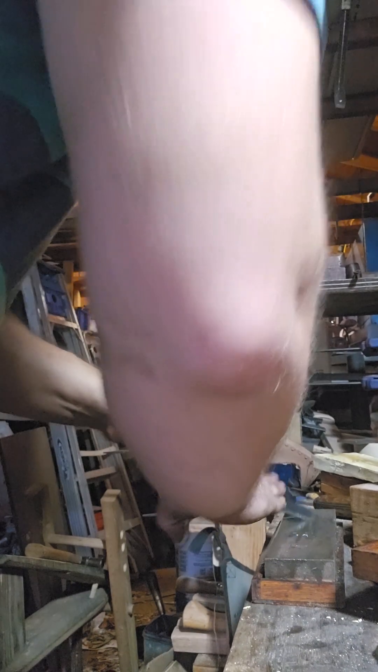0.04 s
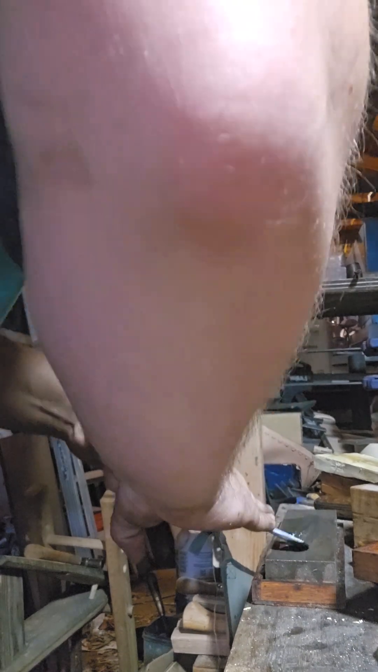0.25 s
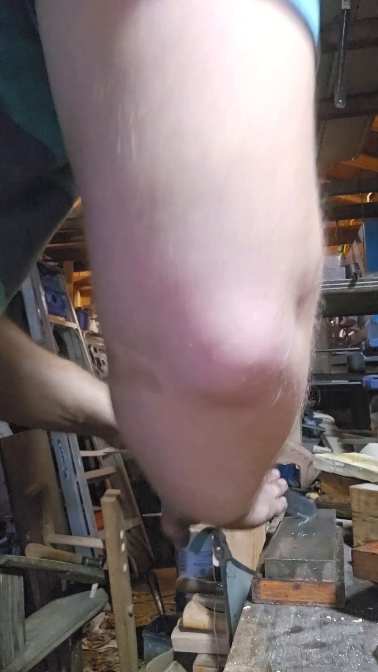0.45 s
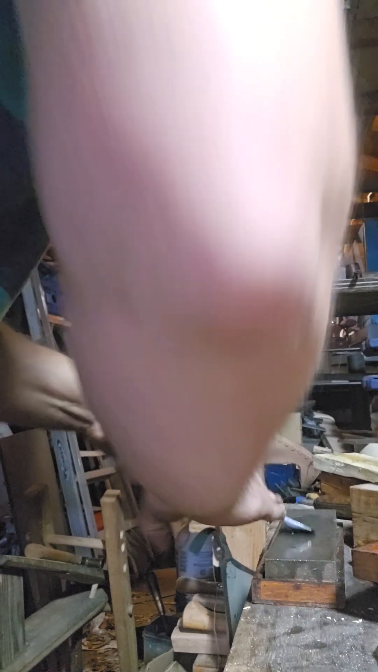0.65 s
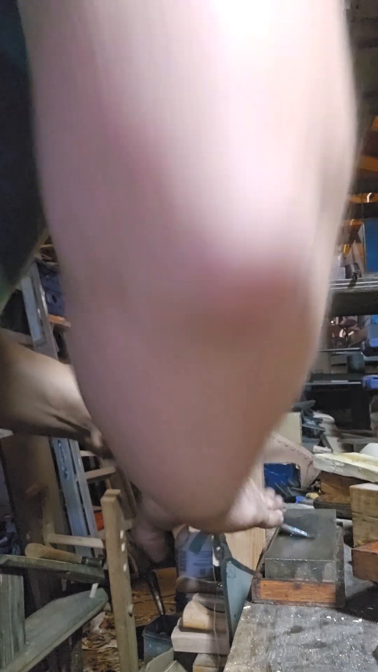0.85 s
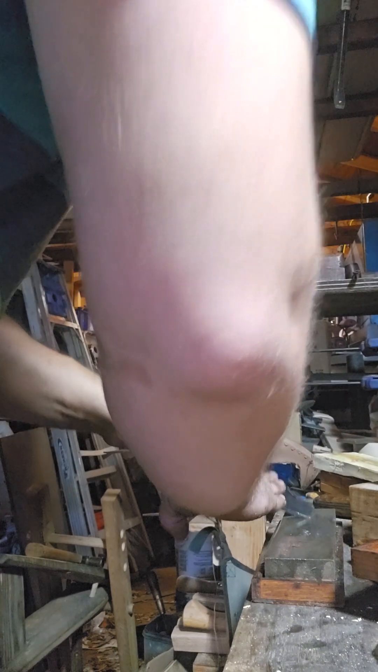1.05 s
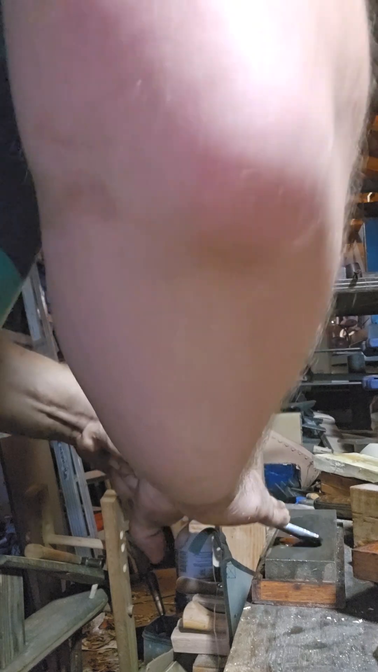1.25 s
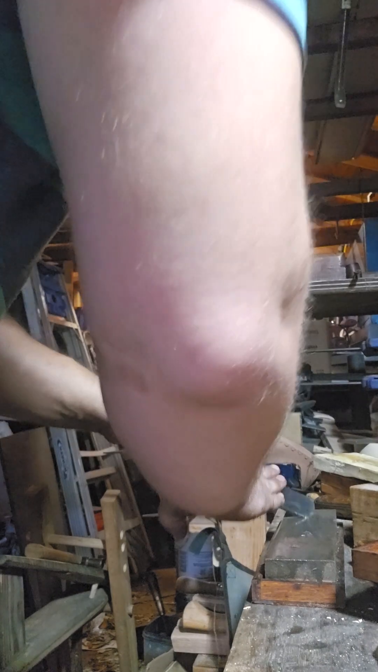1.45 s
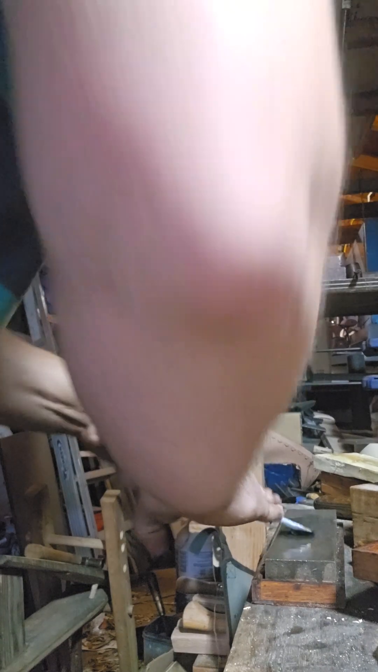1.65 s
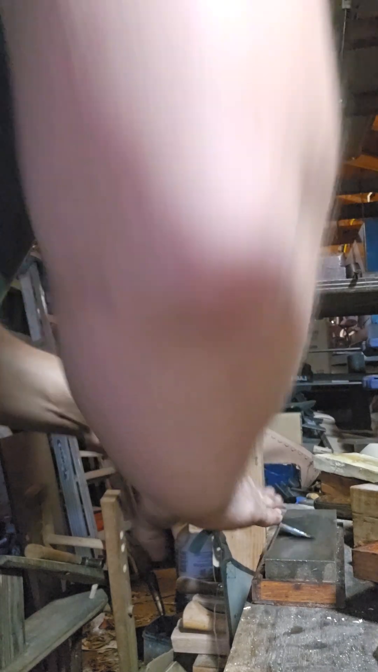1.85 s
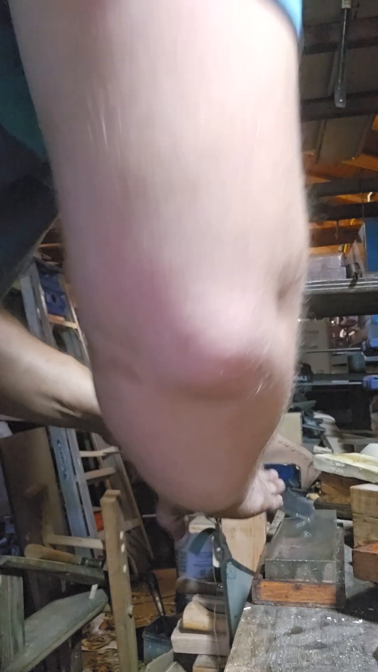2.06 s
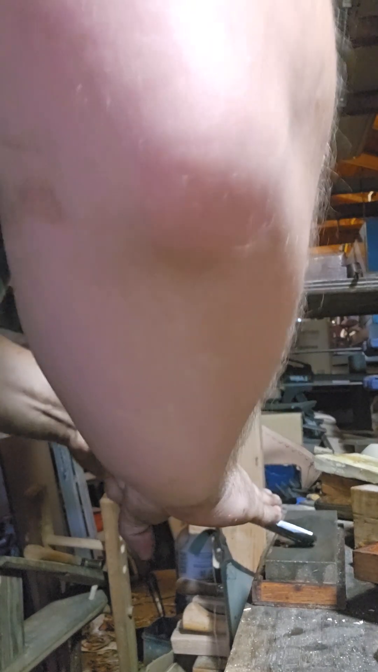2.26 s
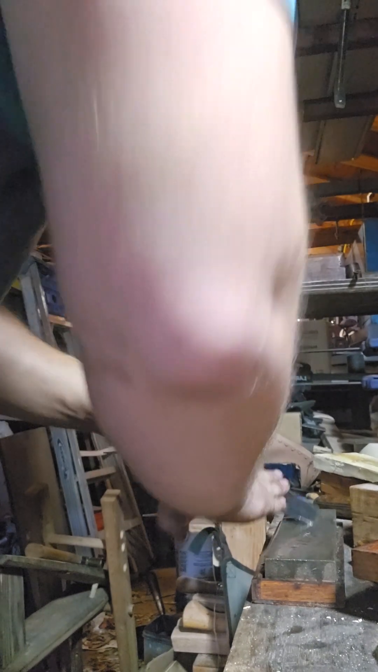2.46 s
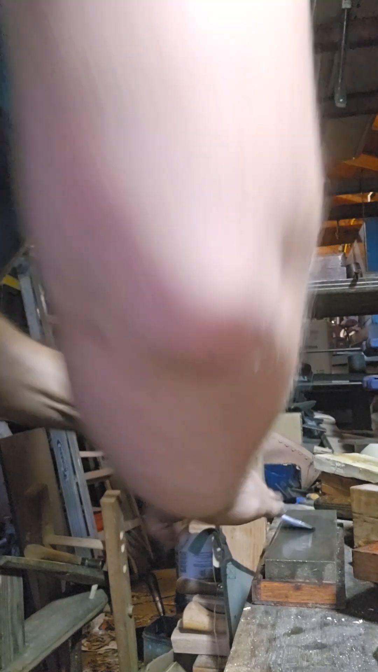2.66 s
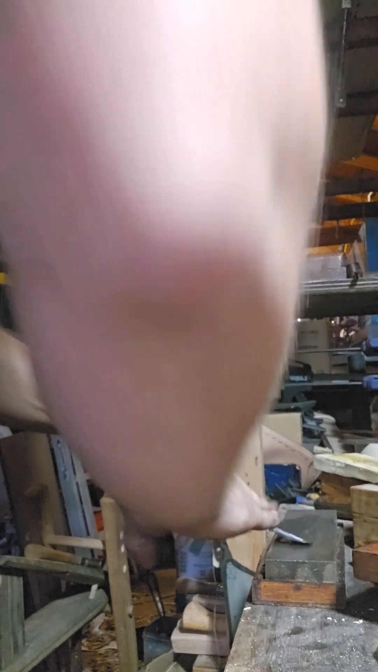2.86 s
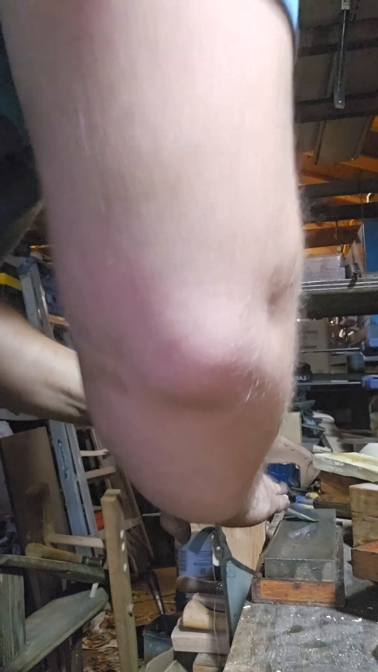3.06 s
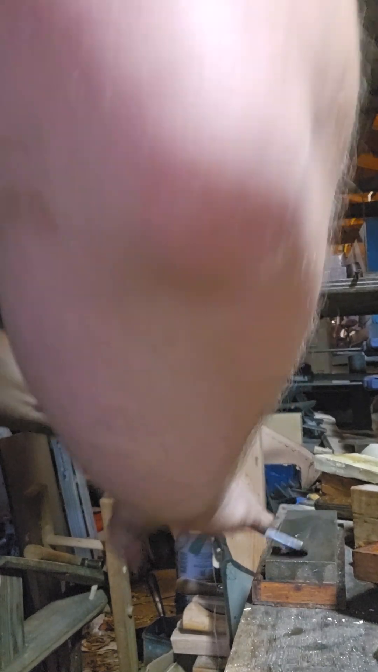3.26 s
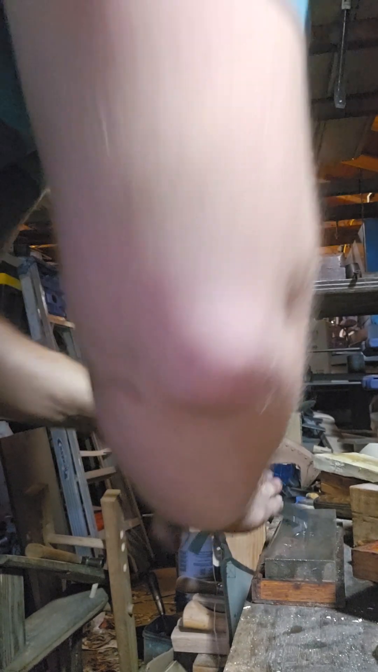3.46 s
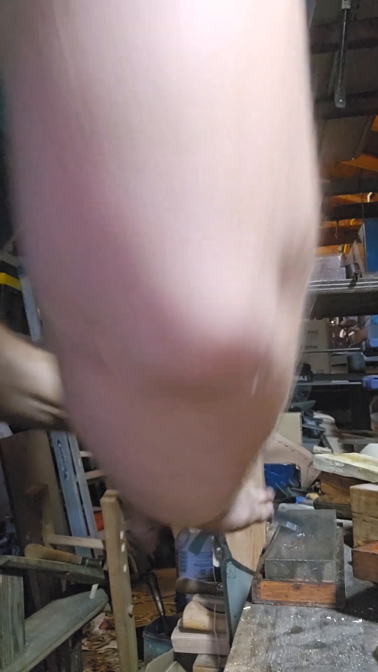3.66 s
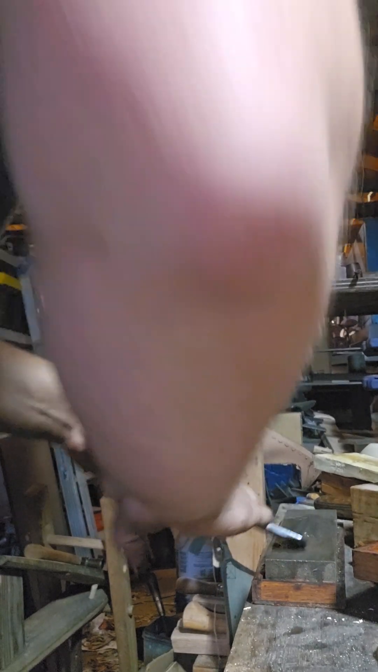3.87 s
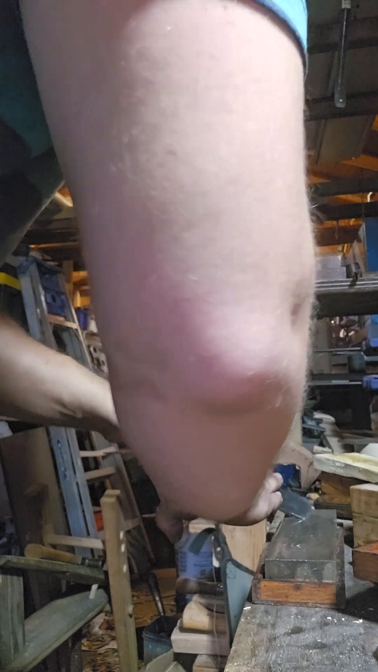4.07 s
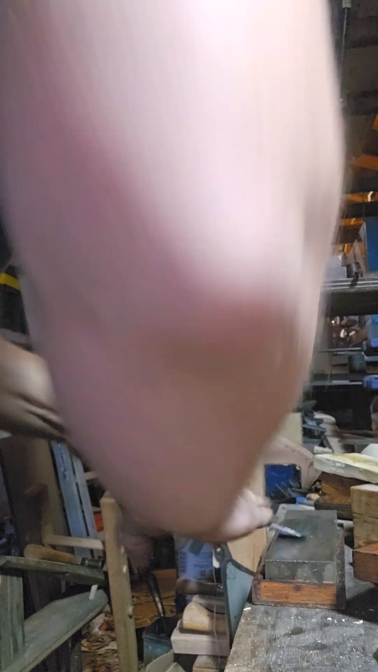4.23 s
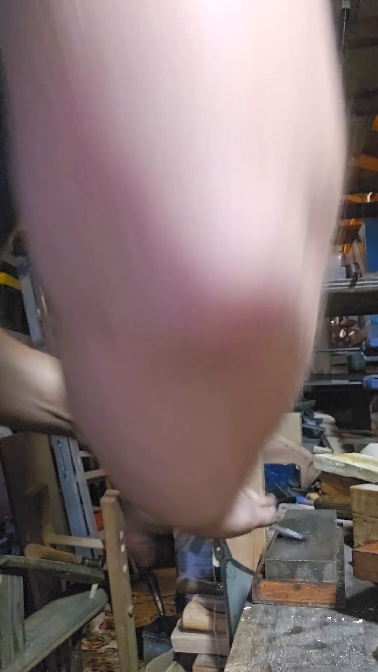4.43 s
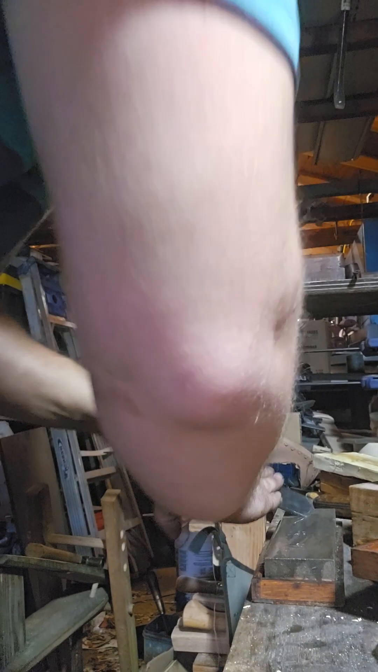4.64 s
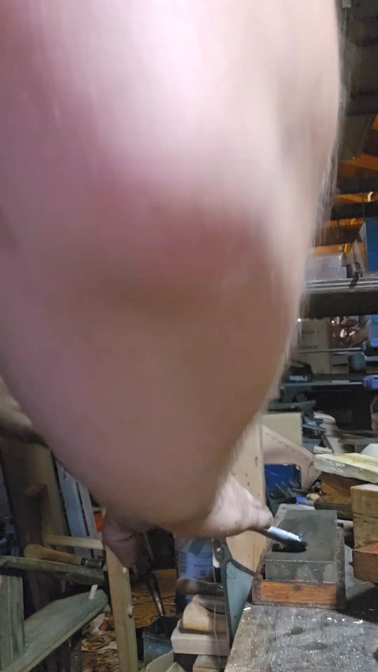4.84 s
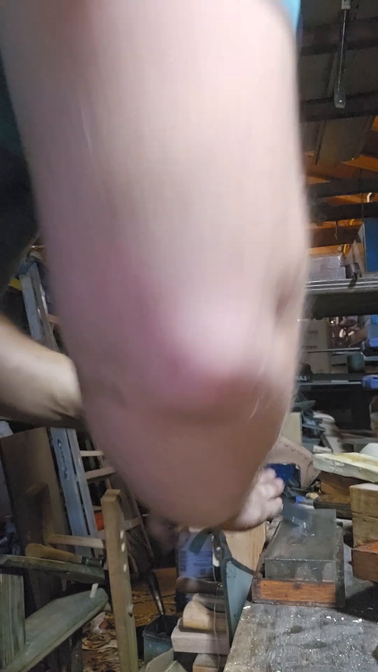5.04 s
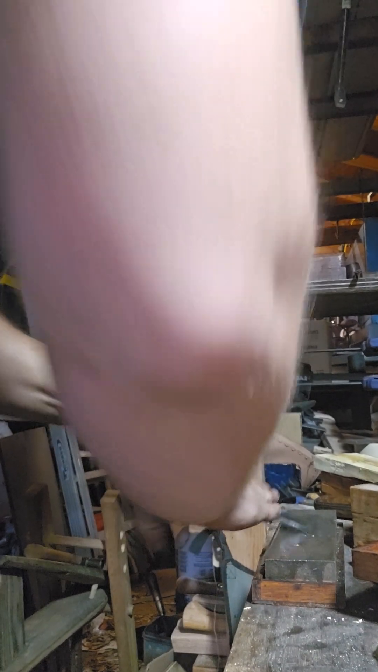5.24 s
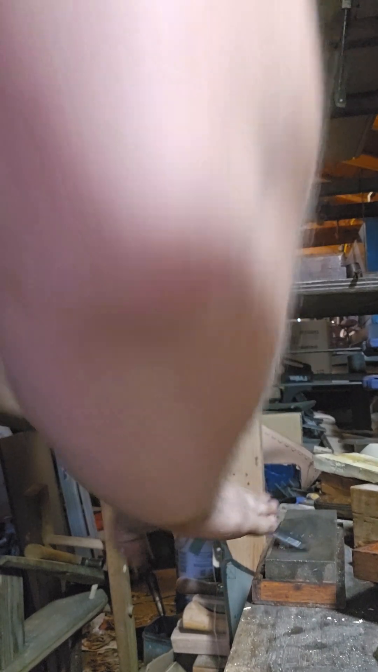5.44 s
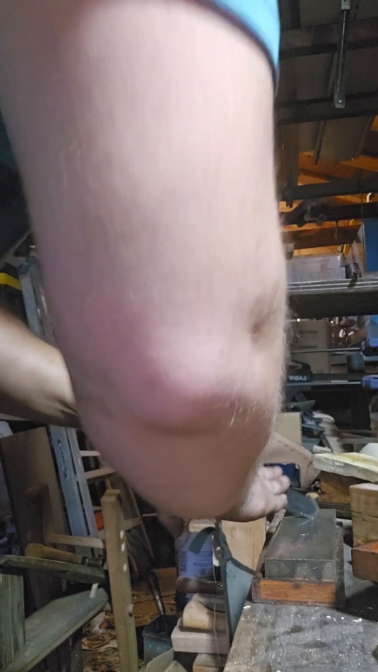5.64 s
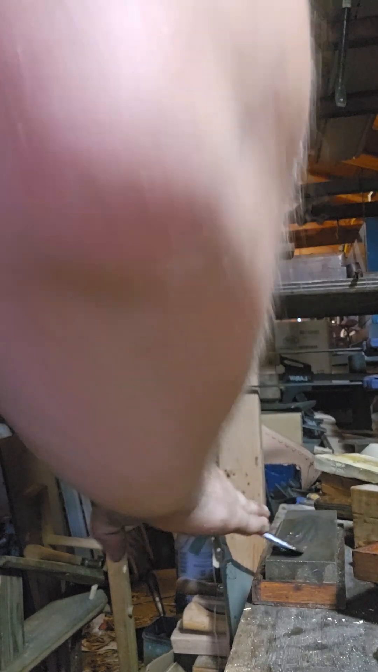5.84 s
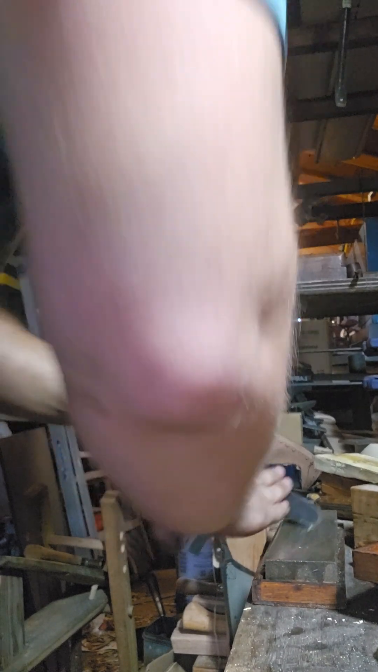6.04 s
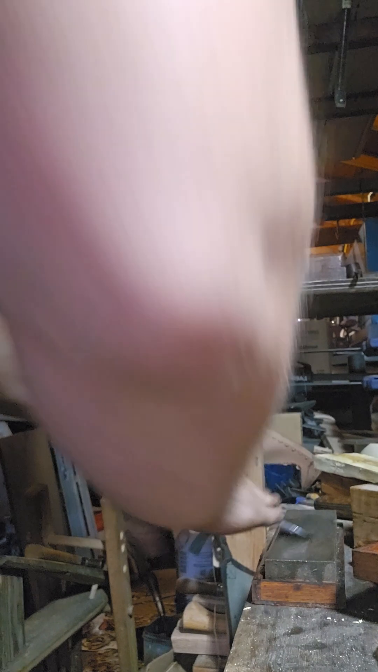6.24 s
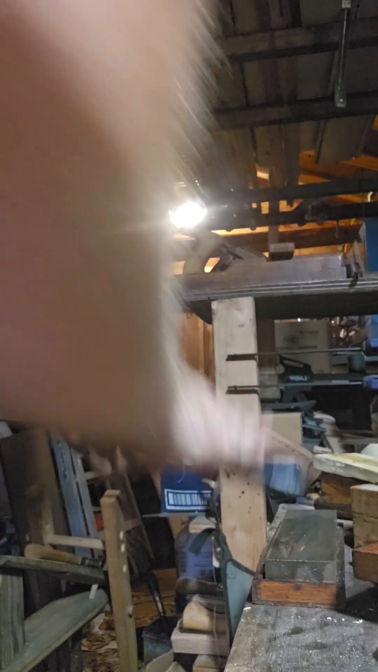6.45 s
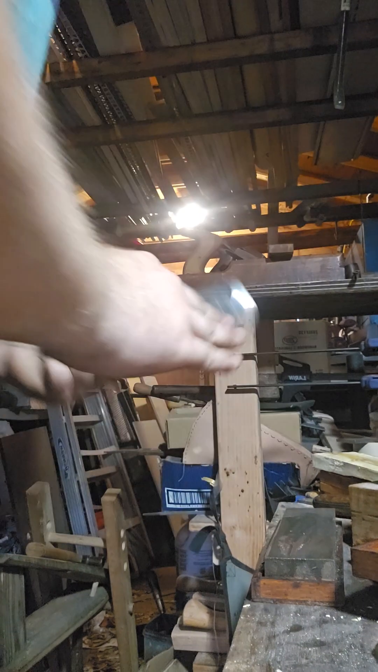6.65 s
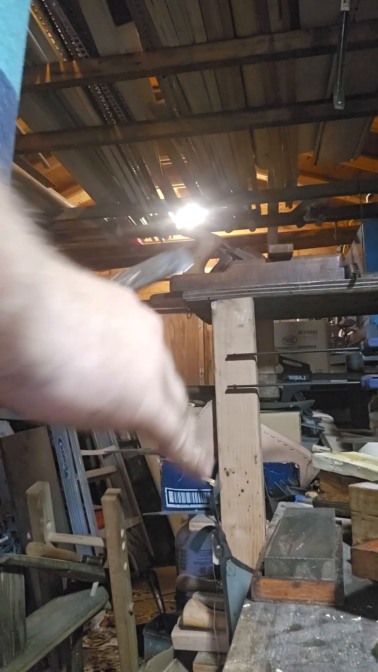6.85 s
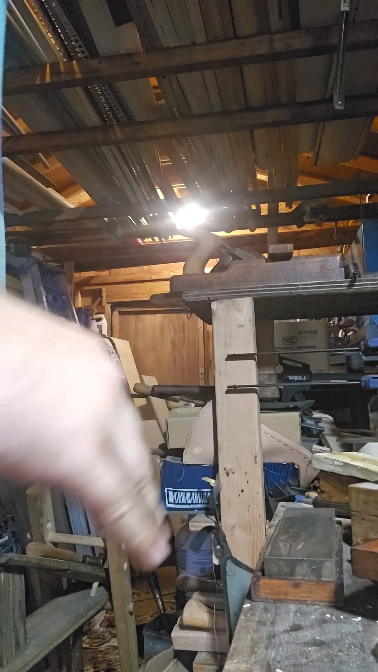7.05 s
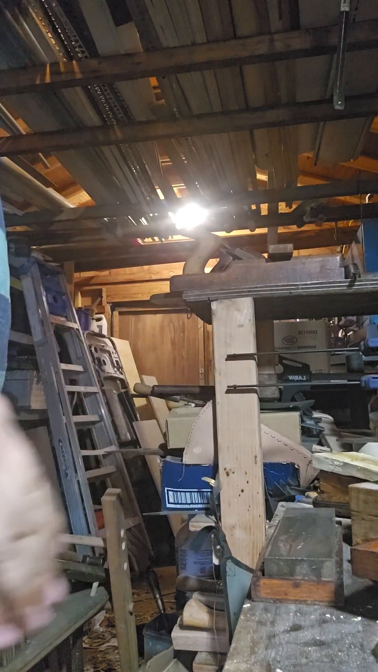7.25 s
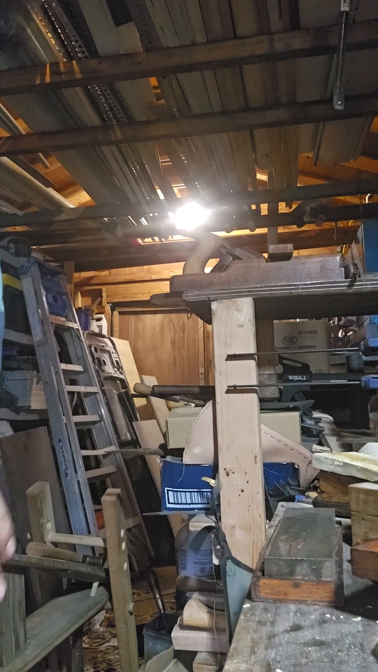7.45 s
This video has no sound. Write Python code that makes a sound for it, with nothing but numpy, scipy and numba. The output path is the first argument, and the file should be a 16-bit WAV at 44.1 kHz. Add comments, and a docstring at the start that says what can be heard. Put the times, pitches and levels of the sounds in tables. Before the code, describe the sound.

A steel plane iron is pushed and pulled over a coarse sharpening stone, about four rasping strokes a second. Grit crunches now and then, the bench vibrates dully underneath, and the stone knocks in its box a few times. Near the end the scraping stops, leaving a soft hiss, a few small wooden knocks and a low rumble. It is heard at arm's length on a phone in a quiet wooden workshop.

```python
"""A steel plane iron is pulled and pushed over a coarse stone on a workbench, an arm's length from a phone.
Friction is a dense train of impacts: grit bites the edge and excites the resonant modes of blade and stone.
The strokes force the bench into vibration, and the stone shifts in its box. The iron is lifted off, leaving
a low rumble, a soft swishing hiss and small wooden knocks in the quiet timber shop."""
import sys
import numpy as np
from scipy import signal
from scipy.fft import rfft, irfft
from scipy.io import wavfile
from scipy.ndimage import uniform_filter1d, map_coordinates
from numba import njit

SR = 44100
rng = np.random.default_rng(int(sys.argv[2]) if len(sys.argv) > 2 else 0)


def to_wav(s):
    """Save 16-bit WAV."""
    ch = np.atleast_2d(s).T  # columns
    pcm = np.round(np.clip(ch, -1, 1) * 32767)  # PCM
    wavfile.write(sys.argv[1], SR, pcm.astype(np.int16))


N = 330735


def undb(db):
    return 10 ** (np.asarray(db) / 20)


def level(x, db):
    return x * undb(db) / np.sqrt(np.mean(x ** 2))


def delayed(x, lag_s):
    return map_coordinates(x, [np.arange(N) - SR * lag_s], order=3)


def curves(table):
    """Linear interpolation of each column over the times in the first."""
    times, *columns = np.transpose(table)
    return [np.interp(np.arange(N) / SR, times, column) for column in columns]


def wander(rate_hz):
    """Smoothed sample-and-hold noise with a spread near 1."""
    hold = int(SR / rate_hz)
    steps = np.repeat(rng.standard_normal(N // hold + 1), hold)
    return 0.92 * uniform_filter1d(uniform_filter1d(steps, hold), hold)[:N]


def coloured_noise(hz, db):
    """Spectral shaping of white noise through (Hz, dB) points."""
    bins_hz = np.maximum(np.fft.rfftfreq(N, 1 / SR), 1)
    gain = undb(np.interp(np.log(bins_hz), np.log(hz), db))
    return irfft(rfft(rng.standard_normal(N)) * gain, N)


def bursts(events, rise_s, sag_db_per_s=0):
    """Exponential decay: each (start, dB, T60, optional hold) rises, sags while held and dies away."""
    out, t = np.zeros(N), np.arange(SR // 2) / SR
    for start, db, t60, *hold in events:
        part = out[int(start * SR):][:len(t)]
        sag_db = sag_db_per_s * np.minimum(t, sum(hold))
        decay_db = -60 * np.maximum(t - sum(hold), 0) / t60
        part += (undb(db + sag_db + decay_db) * (1 - np.exp(-t / rise_s)))[:len(part)]
    return out


@njit
def resonator(x, hz, width, drift):
    """Resonance: two state-variable band-passes in series, their centre scaled by drift."""
    y, band1, low1, band2, low2 = np.empty(len(x)), 0., 0., 0., 0.
    warp, damping = np.tan(np.pi * hz / SR), width / hz
    for i in range(len(x)):
        g = warp * drift[i]
        first = (band1 + g * (x[i] + 1e-18 - low1)) / (1 + g * (g + damping))
        band1, low1 = 2 * first - band1, low1 + 2 * g * first
        second = (band2 + g * (damping * first - low2)) / (1 + g * (g + damping))
        band2, low2 = 2 * second - band2, low2 + 2 * g * second
        y[i] = damping * second
    return y


def struck(events, modes):
    """Impact excitation: short rattling blows drive a set of modes."""
    blows = bursts(events, rise_s=0.00028) * rng.standard_normal(N)
    return sum(undb(db) * resonator(blows, float(hz), float(width), np.ones(N)) for hz, width, db in modes)


def rubbed(modes, force_at, wander_db, wander_hz, detune):
    """Modal superposition: grains kick each mode with random sign; the grip shifts balance and pitch."""
    out, (place, pull) = np.zeros((2, N)), motion()
    grip = undb(wander_db * wander(wander_hz))
    kicks = np.sign(rng.standard_normal(N)) * grip
    drift = 1 + detune * wander(wander_hz)
    shifts = rng.integers(N, size=len(modes))
    for (hz, width, left_db, right_db, pull_db, far_db), shift in zip(modes, shifts):
        drive = force_at(hz) * np.roll(kicks, shift) * undb(pull_db * pull + far_db * place)
        ringing = resonator(drive, float(hz), float(width), np.roll(drift, shift))
        out += undb([[left_db], [right_db]]) * ringing
    return out


# Room tone spectrum. Each row: frequency in Hz, relative density in dB.
RUMBLE_SPECTRUM = [(15, -21.5), (25, -12.5), (54, -11.5), (97, -13), (176, -21.5), (236, -16.5),
                   (406, -48.5), (617, -38.5), (671, -39.5), (700, -46), (910, -67), (1540, -120)]

def rumble():
    """Partial coherence: low room tone, nearly alike left and right."""
    mid, side = (coloured_noise(*np.transpose(RUMBLE_SPECTRUM)) for _ in range(2))
    stereo = mid + 0.32 * side * np.array([[1], [-1]])
    return level(undb(1.2 * wander(5.7)) * stereo, db=-51)


# Swells of hiss. Each row: start, full, fading and end times in seconds, top and end levels in relative dB.
SWISH_SWELLS = [(6.562, 6.846, 7.05, 7.235, -61.5, -77), (7.262, 7.27, 7.415, 7.46, -60, -82)]
# Hiss spectrum. Each row: frequency in Hz, relative density in dB, left minus right in dB.
SWISH_SPECTRUM = [(400, -10.5, 0), (1900, -10, 1.5), (2310, -3, -3), (2700, -10, 1.5), (3940, -4.5, -2),
                  (5300, 2.5, 1), (6410, -10.5, 7.5), (7300, -12.5, 4), (8000, -19, -4), (9730, -32, -0.5),
                  (11000, -21, -2), (13000, -15, 1), (15900, -31, 2)]

def swish():
    """Incoherent noise: a soft hiss, unrelated left and right, swells, breaks off and returns once."""
    points = []
    for start, full, fading, end, top_db, end_db in SWISH_SWELLS:
        points += [(start, -72), (full, top_db), (fading, top_db - 2), (end, end_db)]
    swell_db, = curves(points)
    hz, density, pan = np.transpose(SWISH_SPECTRUM)
    hiss = np.array([coloured_noise(hz, density + side * pan / 2) for side in (1, -1)])
    return undb(swell_db) * level(hiss, db=8.9)


@njit
def walls(x, lags, gain, damping):
    """Feedback delay network: eight paths feed each other, duller on every round."""
    line, dulled, out = np.zeros((8, 4096)), np.zeros(8), np.zeros((2, x.shape[1]))
    for i in range(x.shape[1]):
        for k in range(8):
            dulled[k] += (1 - damping) * (gain[k] * line[k, (i - lags[k]) & 4095] - dulled[k])
            out[k % 2, i] += dulled[k]
        shared = dulled.sum() / 4
        for k in range(8):
            line[k, i & 4095] = x[k // 2 % 2, i] + dulled[k] - shared
    return out


# Paths between the walls. Each entry: travel time in seconds.
WALL_PATHS_S = [.0047, .0063, .0081, .0104, .0131, .0167, .0209, .0258]

def shop_reverb(x, t60_s=0.16):
    """Reverberation: each path loses decibels in proportion to its length."""
    lags = (np.array(WALL_PATHS_S) * SR).astype(int)
    return undb(-7.5) * walls(x, lags, undb(-60 * lags / SR / t60_s), damping=0.4)


# Blows on wood. Each row: start in seconds, relative peak in dB, T60 in seconds.
WOOD_BLOWS = [(6.815, -47, 0.063), (7.15, -33, 0.09), (7.182, -45, 0.058)]
# Modes of the wood. Each row: frequency in Hz, bandwidth in Hz, gain in dB.
WOOD_MODES = [(224, 80, 10.5), (410, 120, -2), (660, 150, -1), (1160, 520, -5.5), (2000, 500, -10.5),
              (2920, 960, -9), (4700, 680, -15)]

def wood_knocks():
    """Damped vibration: wood rings briefly under small knocks after the iron is lifted."""
    return undb(12.5) * struck(WOOD_BLOWS, WOOD_MODES)


# Jolts of the stone. Each row: start in seconds, relative peak in dB, T60 in seconds.
STONE_JOLTS = [(3.956, -33, .16), (4.489, -38, .14), (5.004, -32, .11), (6.43, -33, .044)]
# Modes of the boxed stone. Each row: frequency in Hz, bandwidth in Hz, gain in dB.
STONE_MODES = [(492, 110, 0), (650, 75, -6), (890, 140, -10), (1200, 550, -13.5), (2090, 1400, -13)]

def stone_jolts():
    """Transient response: the stone shifts in its box and rings."""
    return undb(22) * struck(STONE_JOLTS, STONE_MODES)


# Modes of bench top and stone box. Each row: frequency and bandwidth in Hz, then left gain,
# right gain, pull over push and far end over middle of the stone, all in dB.
BENCH_MODES = [(93, 61, -18, -10.5, -3.5, 0.0031), (136.7, 46.6, -15, 5.5, 4, 0.0012),
               (177, 21, -18, -25, -6, 0), (249, 53.3, -8.5, 3, -0.5, 0), (355, 91, -9.5, -20, -4, 0.0018),
               (432.7, 73, -17.5, -11, -4, 0.0047), (490, 105, -29, -9, 0.5, 0.0028),
               (574, 54, -40.5, -19.5, 0, 0), (665, 60, -23, -36, -0.5, 0.0017)]

def bench_shake(shake_db):
    """Forced vibration: the drag of the edge shakes stone box and bench."""
    force = undb(shake_db + 2 * wander(60))
    left, right = rubbed(BENCH_MODES, lambda hz: force, wander_db=1.5, wander_hz=9, detune=0.0064)
    return undb(22.5) * np.array([delayed(left, lag_s=0.00031), right])


# Echo off the bench top, left then right. Each row: lag in seconds, its change per half stroke
# in seconds, reflection factor.
BENCH_ECHOES = [(.000385, .000058, -.4), (.00036, .00006, -.22)]

def bench_echo(x, lag_s, swing_s, reflection):
    """Comb filtering: the treble arrives twice, at a lag that follows the iron and wavers with the hand."""
    treble = x - uniform_filter1d(x, size=7)
    place, _ = motion()
    return x + reflection * delayed(treble, lag_s + swing_s * (place + 0.35 * wander(9)))


CREEP_S, BRAKE_S = .012, .04  # sliding before the edge bites; time the hand takes to stop
# Pulls and pushes in turn. Each row: times of bite, crest and braking in seconds, then in relative dB
# the rasp at those three times, its fall while braking, bench shake, and dull grinding over rasp.
HAND_STROKES = [(-.14, -.02, 0.039, -36, -26, -30.5, -28, -40.5, 1.5),
                (.102, 0.252, 0.31, -38, -25.5, -33, -34, -33, -3),
                (0.347, .43, 0.56, -38.5, -26.5, -33, -40, -41.5, 0),
                (0.611, 0.727, .82, -38.5, -23.5, -31, -38, -31, -3.5),
                (.862, .958, 1.066, -41, -27, -33.5, -32, -42.5, 0),
                (1.132, 1.197, 1.314, -34.5, -28, -28, -26, -33, -2.5),
                (1.38, 1.47, 1.56, -39.5, -25.5, -31.5, -26, -45.5, 1.5),
                (1.625, 1.736, 1.847, -37.5, -26.5, -26.5, -32, -32, -2),
                (1.894, 2.059, 2.112, -34.5, -27, -38, -38, -43, 1),
                (2.167, 2.269, 2.35, -31.5, -27, -25, -30, -32, -1.5),
                (2.409, 2.527, 2.62, -38, -28, -34.5, -32, -41, -0.5),
                (2.696, 2.834, 2.875, -32.5, -21, -30, -24, -32, 1),
                (2.932, 3.017, 3.1, -33.5, -26, -31, -24, -39.5, -1),
                (3.179, 3.275, 3.37, -30.5, -21.5, -32, -28, -32.5, 1),
                (3.423, 3.53, 3.626, -36, -27, -34, -45, -41.5, -1.5),
                (3.7, 3.804, 3.886, -30.5, -25.5, -29.5, -30, -31.5, -1),
                (3.959, 4.081, 4.145, -31, -29, -35, -30, -44, 1.5),
                (4.217, 4.312, 4.42, -33, -24.5, -27, -30, -31, -2),
                (4.467, 4.557, 4.68, -35.5, -26, -33, -40.5, -40, 0),
                (4.747, 4.798, 4.93, -33.5, -25, -29, -28, -31, -2),
                (5.006, 5.16, 5.195, -29, -28, -32, -30, -42, 2),
                (5.265, 5.352, 5.452, -33.5, -24.5, -27, -13, -32, -3),
                (5.514, 5.638, 5.698, -35.5, -24, -34, -30, -39.5, 0.5),
                (5.756, 5.851, 5.94, -32.5, -23.5, -26.5, -28, -28.5, -4),
                (6.001, 6.05, 6.18, -32, -28, -28, -28.5, -39.5, 1),
                (6.247, 6.343, 6.43, -32.5, -23, -25, -33, -30.5, -2.5)]

def stroke_levels():
    """Sliding friction: rasp, shake and grinding in dB follow each stroke; slow sliding grinds duller."""
    rows = []
    for k, stroke in enumerate(HAND_STROKES):
        bite, crest, brake, bite_db, crest_db, brake_db, fall_db, shake_db, dull_db = stroke
        shake_slope = 0.54 if k % 2 else 0.16  # dB per dB of rasp: push, pull
        for s, db in [(bite - CREEP_S, bite_db - 19.5), (bite, bite_db),
                      (crest, crest_db), (brake, brake_db)]:
            shake = shake_db + shake_slope * (db - crest_db)
            dull = dull_db - 0.34 * (max(db, bite_db) - crest_db)
            rows.append((s, db, shake, dull))
        rows.append((brake + BRAKE_S, brake_db + fall_db, shake_db - 16, dull_db))
    rows = np.array(rows)
    rows[:, 0] = np.maximum.accumulate(rows[:, 0])
    return curves(rows)


def motion():
    """Reciprocating motion: place on the stone (-1 near, 1 far) and direction (.5 pull, -.5 push)."""
    turns = [stroke[0] - CREEP_S for stroke in HAND_STROKES] + [HAND_STROKES[-1][2] + BRAKE_S]
    place = np.interp(np.arange(N) / SR, turns, (-1.) ** np.arange(len(turns)))
    return place, -np.sign(np.gradient(place)) / 2


# Coarse grains dragged by the edge. Each row: start in seconds, relative peak in dB, drag in seconds.
COARSE_GRAINS = [(.2157, -13, .003), (1.724, -22, .003), (1.823, -11, .003), (1.9779, -15, .003),
                 (2.4394, -23, .003), (3.017, -13.5, .003), (3.273, 1, .06), (3.453, -19, 0.0028),
                 (3.521, -9, .03), (3.7933, -13, .003), (4.401, -13.5, 0.0026), (4.5062, -18, .003),
                 (4.775, -12, .015), (4.9876, -24, .003), (5.389, -12, .003), (5.8017, -16, .003),
                 (6.3111, -8, .003)]

def stick_slip(stall_depth=0.43, lead_s=0.0069, crest_factor_db=12, t60_s=.075):
    """Stick-slip: at each coarse grain or bite the edge slows (stall), then tears free (catch)."""
    grabs = [(bite, bite_db + (12 if k % 2 else 4), 0)  # pushes grab harder than pulls
             for k, (bite, _, _, bite_db, *_) in enumerate(HAND_STROKES[1:], start=1)]
    events = [(s, db - crest_factor_db, t60_s, drag_s) for s, db, drag_s in COARSE_GRAINS + grabs]
    marks = np.zeros(N)
    marks[[int(s * SR) for s, *_ in events]] = stall_depth
    slowing = signal.lfilter([1], [1, -np.exp(-1 / (lead_s * SR))], marks[::-1])[::-1]
    stall = 1 - np.minimum(slowing, 1)
    catch = bursts(events, rise_s=0.00033, sag_db_per_s=-150)  # a dragged grain crumbles
    return stall, catch


# Modes of iron and stone. Each row: frequency and bandwidth in Hz, then left gain, right gain,
# pull over push and far end over middle of the stone, all in dB.
BLADE_MODES = [(902, 192, -22.5, -19.5, 2, 0.6), (1200, 1130, -27, -42, 1.5, 1),
               (1716, 390, -26.5, -26, -0.5, -3.5), (2066, 190, -17, -46.5, 0, -1),
               (2335, 360, -22, -14, 2.5, -2.7), (2311, 79, -14.5, -6.5, 6.5, 0.5),
               (2602, 300, -15.5, -13.5, 2, 8.5), (2936, 340, -10, -8, 1, -0.5),
               (3190, 130, -23.5, -7.5, 8.5, -1.5), (3520, 430, -13.5, -2, 2, -3.5),
               (3715, 72, -14, 1, -0.6, 7), (3936, 344, -13, -1.5, -3.5, -0.7),
               (4240, 520, -11.5, -14.5, -2.5, 4.5), (4550, 205, -17, -6, 1, 11.5),
               (4815, 367, -11.5, 2, 0.4, 2), (5250, 550, -1, -20, 2.9, -2.5),
               (5473, 180, -5.5, -21.5, 0.5, -8), (5930, 340, -23.5, -33, -8, 7.5),
               (6390, 400, -22.5, -13, 2, -2.5), (6400, 430, -13, -16, -1, -5.5),
               (7160, 620, -9.5, -34, 1, -0.5), (7300, 490, -16.5, -21, 6, -2.5),
               (8230, 1130, -37, -21, -0.1, 2), (9130, 1240, -37, -27.0, 4, -5.5),
               (10330, 1500, -46.5, -27.5, -2, 2), (11640, 940, -30, -25.5, 4.5, -5),
               (12600, 1500, -22, -38.5, 1, -1.5), (13600, 1150, -32, -49, 2, -2),
               (14430, 1152, -28, -47, 5.5, -5), (15141, 1212, -28, -41, 1.5, -1)]

def blade_rasp(rasp_db, dull_db, grains_per_s=8000, spread_db=2.5):
    """Shot-noise excitation: dense grit of uneven size rings iron and stone; catches crunch duller."""
    size = np.minimum(rng.exponential(size=N), 4)
    grit = (rng.random(N) < grains_per_s / SR) * undb(spread_db * size)
    grit = level(grit * undb(1.37 * wander(120)), db=0)
    stall, catch = stick_slip()
    slide = undb(rasp_db) * stall
    low = grit * np.hypot(undb(dull_db) * slide, undb(3) * catch)
    middle = grit * np.hypot(slide, catch)
    high = grit * np.hypot(slide, undb(-4) * catch)
    ringing = rubbed(BLADE_MODES, lambda hz: low if hz < 2200 else high if hz > 5700 else middle,
                     wander_db=3, wander_hz=22, detune=0.016)
    left, right = (bench_echo(x, *echo) for x, echo in zip(ringing, BENCH_ECHOES))
    place, _ = motion()
    left = delayed(left, lag_s=0.0005196 + .0001 * place)  # the path lengthens towards the far end
    return undb(16.5) * np.array([left, right])


def scene():
    """Superposition of the sharpening, the knocks, their reverberation and the background."""
    rasp_db, shake_db, dull_db = stroke_levels()
    lift_db = -60 * (np.arange(N) > (HAND_STROKES[-1][2] + BRAKE_S) * SR)
    shake = bench_shake(shake_db + lift_db)
    airborne = blade_rasp(rasp_db + lift_db, dull_db) + stone_jolts() + wood_knocks()
    # the shake reaches the phone mostly through the wood, so the walls get little of it
    reverb = shop_reverb(airborne + undb(-6.5) * shake)
    return airborne + shake + reverb + swish() + rumble()


def record(dry):
    """Band limiting: the phone clips and cuts the top treble, from a lower frequency on the right."""
    left, right = dry
    right_lowpass = signal.ellip(5, .5, 14, 13160, fs=SR, output="sos")
    lowpass = signal.ellip(14, .2, 90, 15735, fs=SR, output="sos")
    clipped = np.clip([left, signal.sosfilt(right_lowpass, right)], -1, 1)
    return signal.sosfilt(lowpass, clipped)


dry = scene()
out = record(dry)
to_wav(out)
```